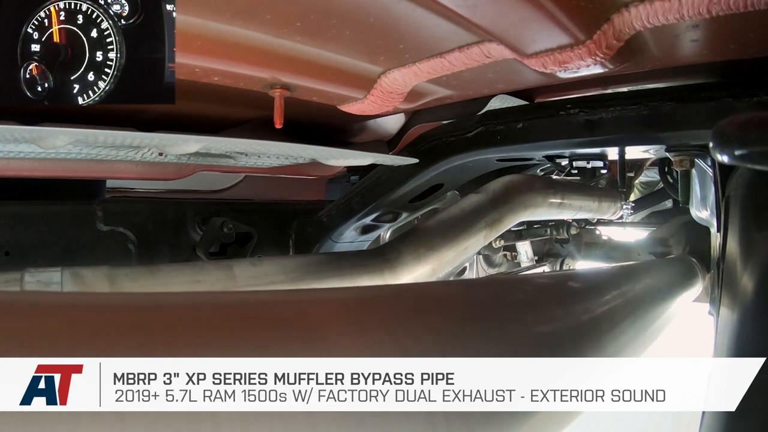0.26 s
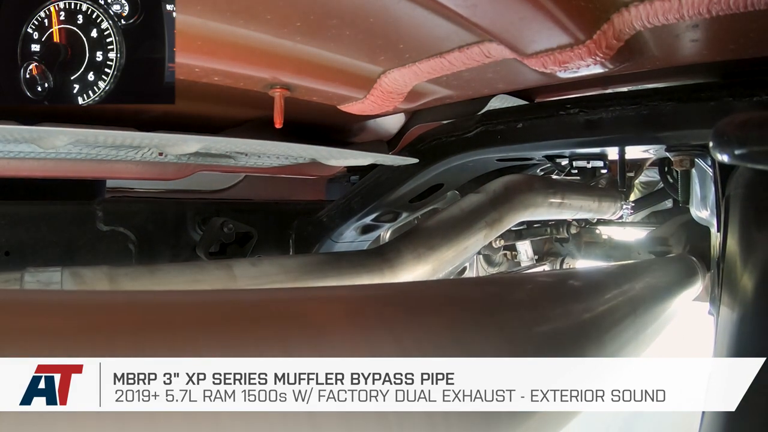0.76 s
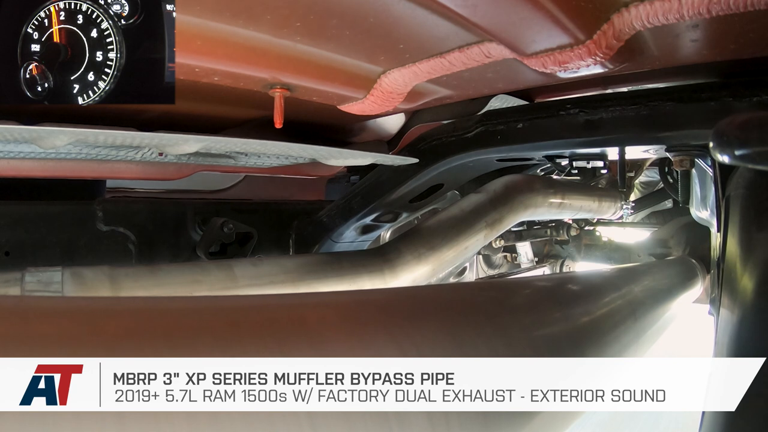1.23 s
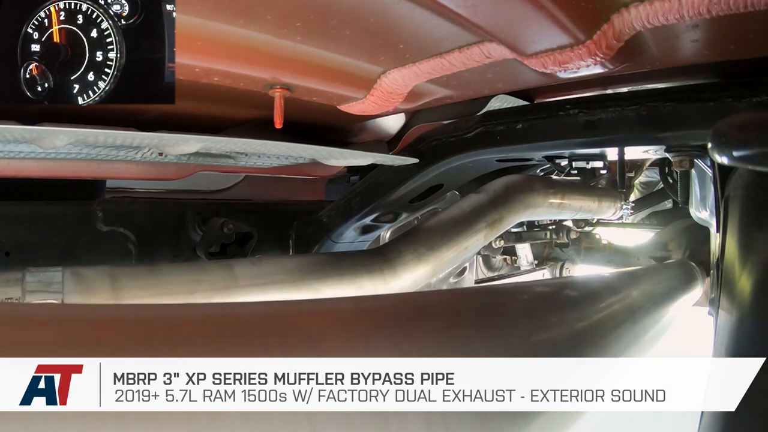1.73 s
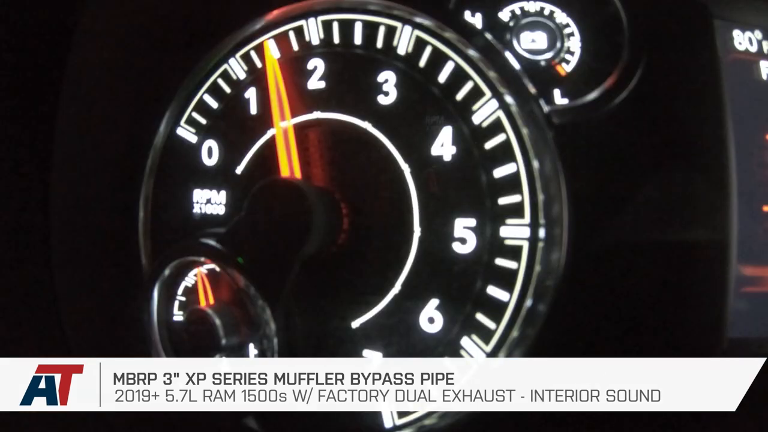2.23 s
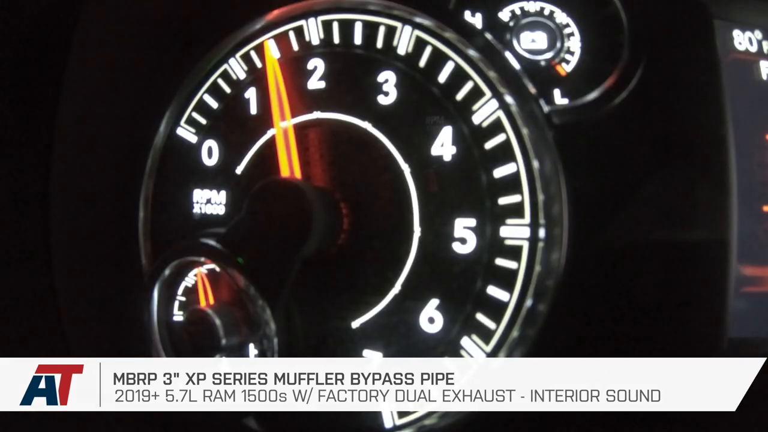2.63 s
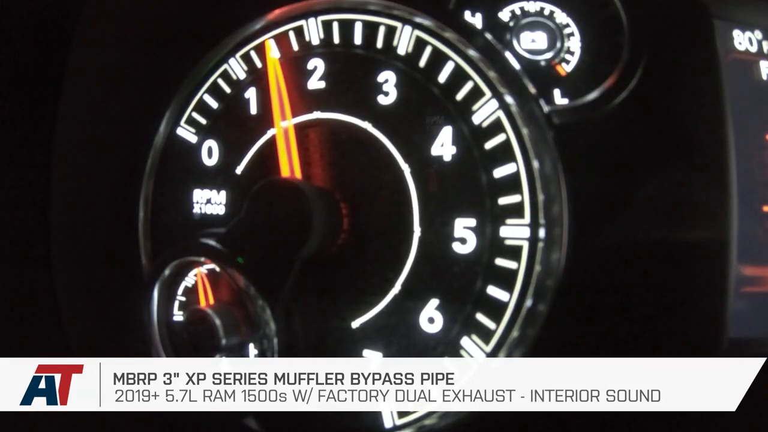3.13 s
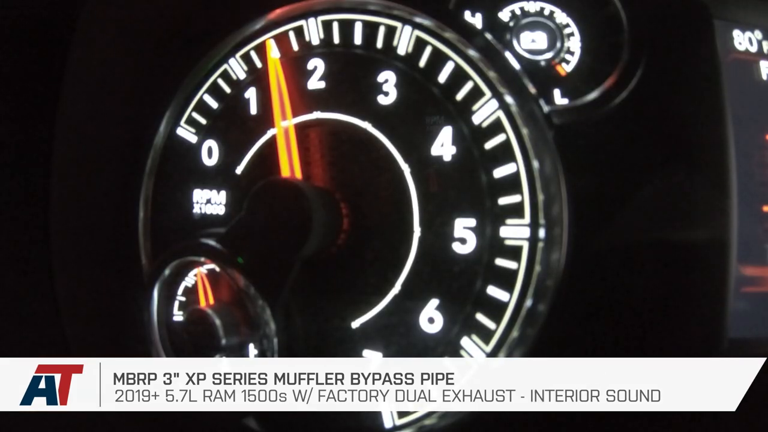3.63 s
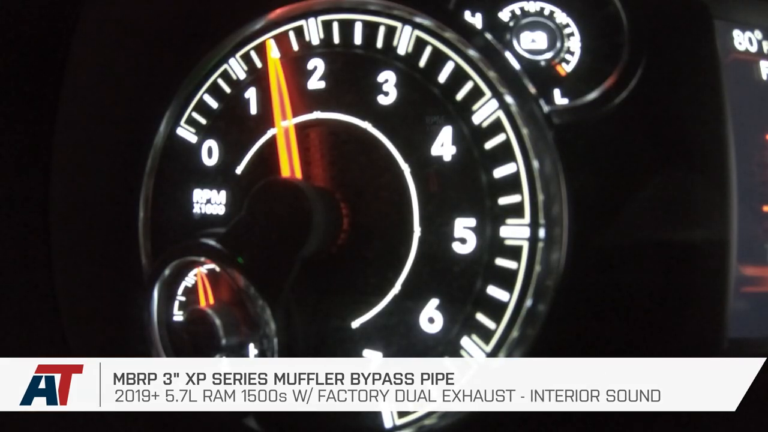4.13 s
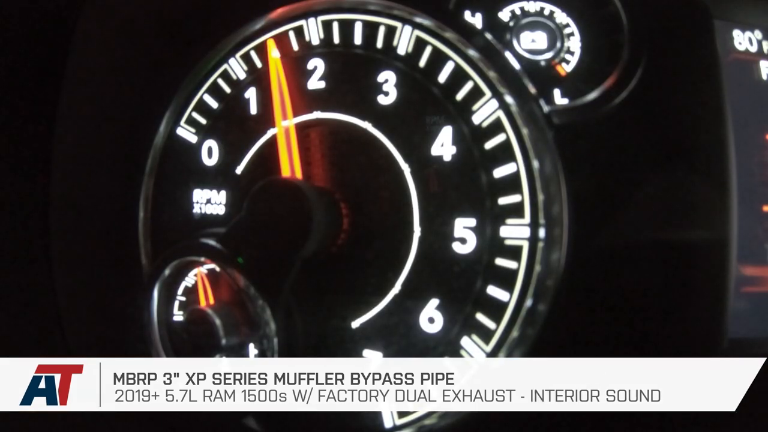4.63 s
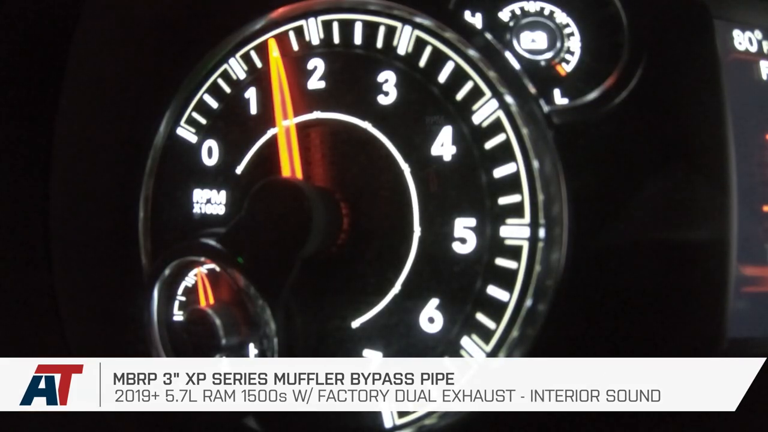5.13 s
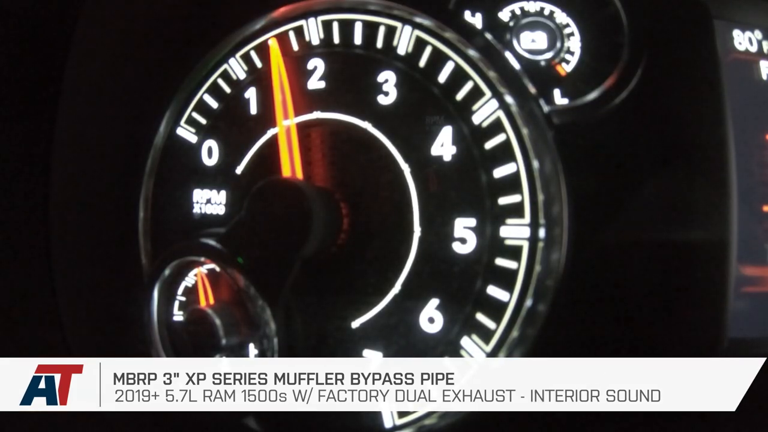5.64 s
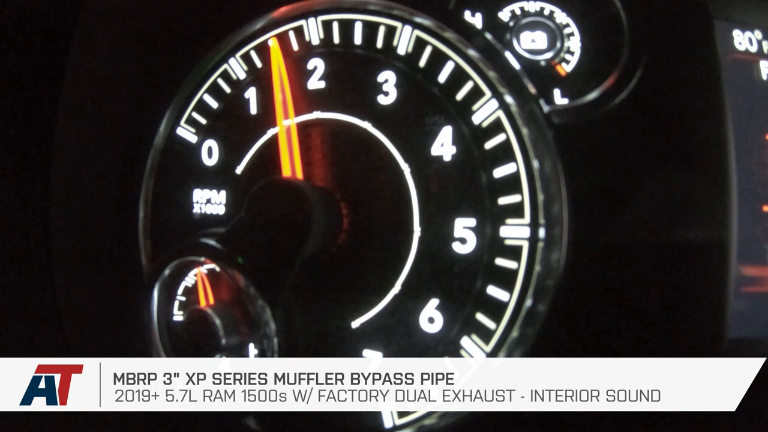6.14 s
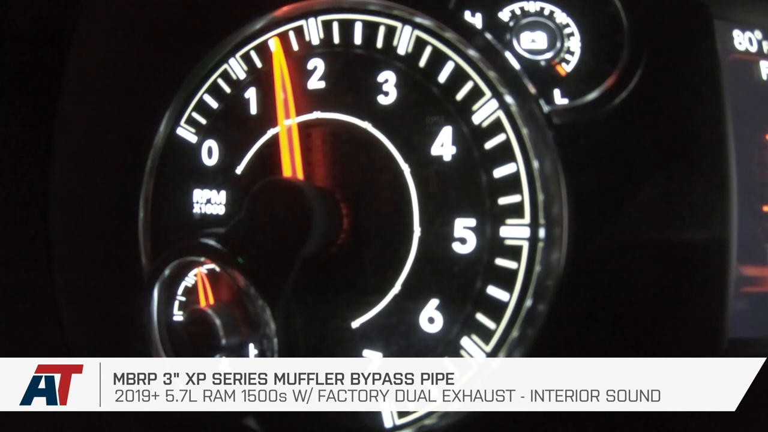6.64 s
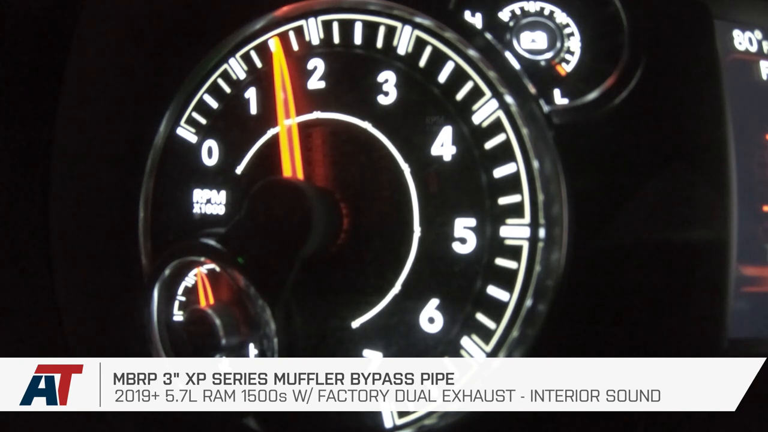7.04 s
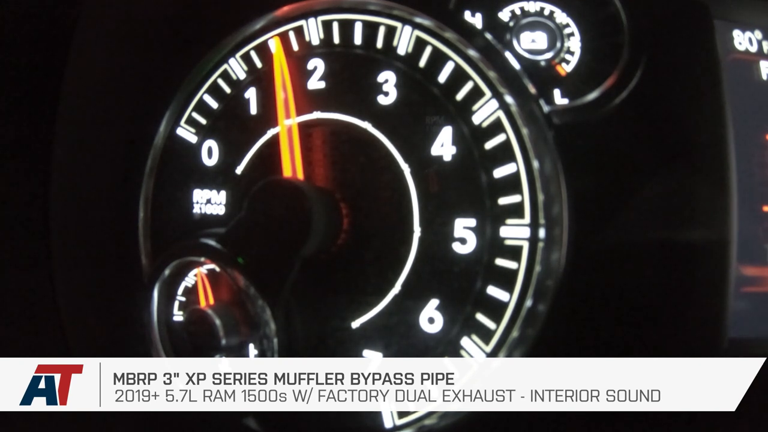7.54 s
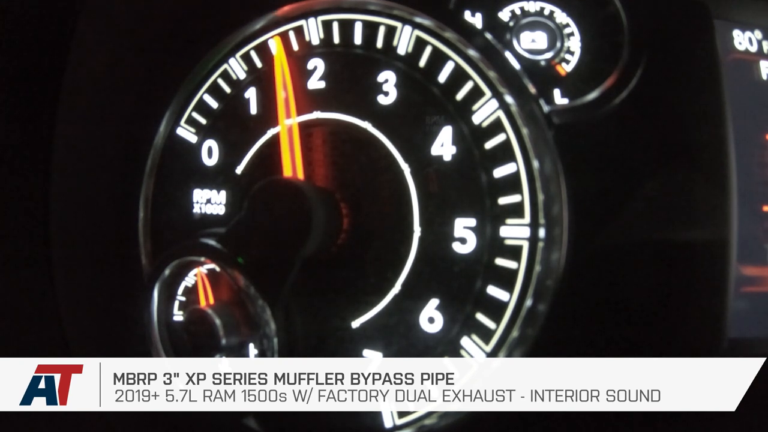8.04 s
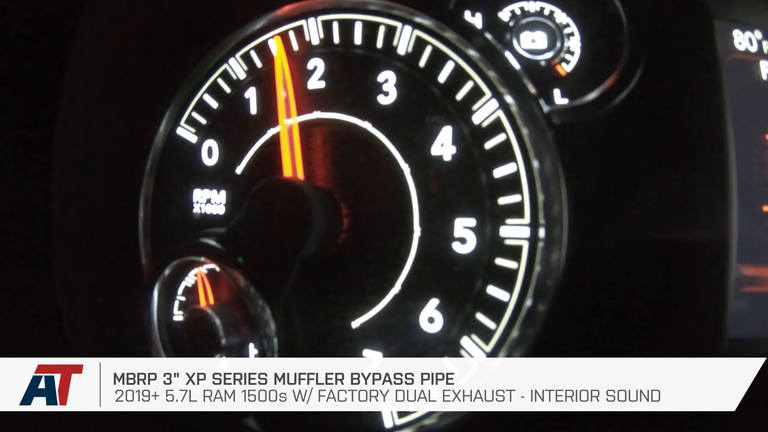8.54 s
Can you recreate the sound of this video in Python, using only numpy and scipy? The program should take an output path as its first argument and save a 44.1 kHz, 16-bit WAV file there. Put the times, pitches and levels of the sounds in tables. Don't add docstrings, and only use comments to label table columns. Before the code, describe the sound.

Loud, raspy, pulsing tailpipe boom of an idling V8 for two seconds, then a muffled low cab hum with a faint cloth rub.

```python
import sys
import numpy as np
from scipy import signal
from scipy.fft import rfft, irfft, next_fast_len
from scipy.io import wavfile

SR = 44100
rng = np.random.default_rng(int(sys.argv[2]) if len(sys.argv) > 2 else 0)


def dump(signal):
    limited = np.clip(np.atleast_2d(signal).T, -1, 1)
    pcm = np.round(limited * 32767).astype(np.int16)
    wavfile.write(sys.argv[1], SR, pcm)


def gain_from_decibels(decibels):
    exponent = np.asarray(decibels, float) / 20
    return 10 ** exponent


N = 387198
TIME = np.arange(N) / SR


def in_time(rows):
    seconds, values = np.transpose(rows)
    return np.interp(TIME, seconds, values)


def rms_one(x):
    return x / np.sqrt(np.mean(x ** 2) + 1e-20)


def drift(rate, count=None):
    points = rng.standard_normal(int(N / SR * 60) + 9)
    memory = np.exp(-2 * np.pi * rate / 60)
    slow = signal.lfilter([1], [1, -memory], points)
    return np.interp(TIME[:count] * 60, np.arange(len(slow)), rms_one(slow))


def resonance(hz, centre, width, lift_db):
    return lift_db / (1 + (2 * (hz - centre) / width) ** 2)


def noise(spectrum, rings=()):
    size = next_fast_len(N)
    hz = np.arange(1, size // 2 + 2) * SR / size
    points = np.array(spectrum, float)
    db = np.interp(np.log(hz), np.log(points[:, 0]), points[:, 1], left=-200, right=-200)
    for centre, width, lift_db in rings:
        db = db + resonance(hz, centre, width, lift_db)
    shaped = rfft(rng.standard_normal(size)) * gain_from_decibels(db)
    return irfft(shaped, size)[:N] * np.sqrt(SR / 2)


def bank_phase(k):
    right_bank = [0, 1, 1, 0, 1, 0, 0, 1]
    cylinder_db = [0, -3, -3.3, 4.5, 0, 4, 0, 2]
    boom_start, right_lead = .746, .082
    pulse_turn = .044
    at = boom_start + np.arange(8) / 8 - right_lead * np.array(right_bank)
    pulses = gain_from_decibels(np.array(cylinder_db)) * np.exp(-2j * np.pi * (k * at - pulse_turn))
    echoes = np.clip((k - 11) / 10, 0, 1) * rng.uniform(-np.pi, np.pi)
    return np.angle(np.sum(pulses)) + echoes


def orders(table, cycles, wobble_db, count):
    out = np.zeros(N)
    for k, level_db in table:
        waver = gain_from_decibels(level_db + wobble_db * np.sqrt(k / 8) * drift(4.0, count=count))
        out[:count] += waver * np.cos(2 * np.pi * k * cycles[:count] + bank_phase(k))
    return out


def tail_orders():
    # (multiple of the cycle rate, level [dB])
    low_orders = [(1, -19), (2, -27), (3, -23), (4, -30), (5, -1), (6, -24), (7, -13), (8, 0), (9, -15),
                  (10, -19), (11, -16), (12, -31), (13, -21), (14, -21), (15, -23), (16, -28), (17, -18),
                  (18, -26), (19, -23), (20, -23), (21, -27), (22, -34), (23, -25), (24, -32)]
    # (multiple of the cycle rate, level [dB])
    pipe_response = [(25, -39), (28, -40), (29, -30), (45, -35), (55, -37), (58, -33.5), (60, -37),
                     (62, -43)]
    k = np.arange(25, 63)
    first, last = 29, 52
    depth = 4.5 * (k >= first) * np.clip((last - k) / (last - first), 0, 1)
    comb = depth * np.cos(2 * np.pi * (k - 29.7) / 3.75)
    high_db = np.interp(k, *np.transpose(pipe_response)) + comb
    return low_orders + list(zip(k, high_db))


def puffs(cycles, sharpness, scatter_db):
    puff_db = [-0.42, 0.7, 0.34, -2.9, -1.3, 0.91, 0.8, -0.99]
    firing = (cycles - .02) * 8 + .5
    index = np.floor(firing).astype(int) + 8
    scatter = scatter_db * rng.standard_normal(1200)[index]
    strength = gain_from_decibels(np.array(puff_db)[index % 8] + scatter)
    return strength * (.5 - .5 * np.cos(2 * np.pi * firing)) ** sharpness


def tailpipes():
    # (time [s], four-stroke cycle rate [Hz])
    tail_speed = [(0, 14.155), (2.4, 14.236)]
    # (frequency [Hz], density [dB per Hz])
    flow_colour = [(9, -56.5), (15, -59), (24, -63), (40, -74), (55, -74), (90, -66.5), (150, -74.5),
                   (250, -78), (360, -83.5), (440, -73.5), (600, -77), (810, -74.5), (950, -83),
                   (1100, -86)]
    # (frequency [Hz], density [dB per Hz])
    rasp_colour = [(750, -105), (950, -86), (1200, -84), (1700, -89), (2300, -92), (2750, -93), (3100, -98),
                   (3600, -100), (3900, -112)]
    # (frequency [Hz], density [dB per Hz])
    hiss_colour = [(3200, -116), (3800, -103), (4500, -106), (5100, -105), (5700, -110), (6400, -112),
                   (7100, -116), (8000, -119), (9000, -121), (11000, -123), (11900, -125), (12600, -131),
                   (13000, -145), (16000, -150)]
    # (frequency [Hz], width [Hz], lift [dB])
    pipe_rings = [(1410, 110, 7), (1915, 60, 4), (2200, 150, 2), (3390, 350, 5), (4100, 300, 2),
                  (4730, 200, 5), (5500, 250, 3), (2660, 80, 3), (2900, 200, -3), (5993, 40, 7),
                  (6795, 25, 8), (7925, 20, 13), (8050, 40, 7), (8838, 50, 5)]
    cycles = np.cumsum(in_time(tail_speed)) / SR + .006
    boom = gain_from_decibels(-26.9) * orders(tail_orders(), cycles, wobble_db=.25, count=int(2.4 * SR))
    flow = puffs(cycles, sharpness=1.6, scatter_db=2.5)
    spit = puffs(cycles, sharpness=1.3, scatter_db=3.5)
    low = noise(flow_colour) * rms_one(1 + .6 * flow)
    rasp = noise(rasp_colour, pipe_rings) * rms_one(1 + .95 * flow) * gain_from_decibels(.5 * drift(6))
    hiss = noise(hiss_colour, pipe_rings) * rms_one(1 + .65 * spit)
    return boom + low + rasp + hiss


def engine_hum(speed, cycles):
    # (time [s], level [dB])
    load = [(2.35, -42), (3.5, -41.5), (4.1, -43), (5.4, -45.5), (6.0, -43), (7.3, -43), (8.0, -44.5),
            (8.78, -43)]
    # (multiple of the cycle rate, level [dB])
    weak_orders = [(7, -67), (9, -64), (10, -76), (11, -71.5), (14, -70), (15, -78.5), (16, -73),
                   (23, -78.5),
                   (6, -67), (17, -75), (20.7, -74), (24.4, -79), (28, -78), (29.6, -79), (31, -80),
                        (32.6, -82), (49.4, -84), (53.8, -85), (57.4, -84)]
    hum = gain_from_decibels(in_time(load)) * orders([(8, 3.5)], cycles, wobble_db=.6, count=N)
    throb_db = -52.5 + 6 * np.abs(speed - 13.3)
    throb = gain_from_decibels(throb_db) * orders([(5, 1.0)], cycles, wobble_db=1.6, count=N)
    weak = gain_from_decibels(3.0) * orders(weak_orders, cycles, wobble_db=1.5, count=N)
    return hum + throb + weak


def body_rumble():
    # (frequency [Hz], density [dB per Hz])
    rumble_colour = [(7, -9.5), (18, -1), (30, -7), (50, -12), (70, -11.5), (92, -17.5), (130, -20.5),
                     (170, -26)]
    return gain_from_decibels(-47 + drift(1.7)) * rms_one(noise(rumble_colour))


def whine(hz):
    turns = np.cumsum(hz + 6 * drift(8)) / SR
    return rms_one(gain_from_decibels(2.5 * drift(9)) * np.cos(2 * np.pi * turns))


def accessory_whine(speed, above_mean):
    # (frequency [Hz], width [Hz], lift [dB])
    overtone_mode = (797, 30, 5)
    hz, overtone_hz = 28.85 * speed, 58.2 * speed
    first_db = -72 - 7 * above_mean
    second_db = -76 + resonance(overtone_hz, *overtone_mode)
    return gain_from_decibels(first_db) * whine(hz) + gain_from_decibels(second_db) * whine(overtone_hz)


def cab_wash(above_mean):
    # (frequency [Hz], density [dB per Hz])
    wash_colour = [(79, -32.5), (135, -1), (173, -3.5), (201, -4), (328, -6), (356, -2.5), (386, -8),
                   (548, -15), (806, -12), (938, -20.5), (1500, -28), (2200, -46), (2860, -71),
                   (4840, -120)]
    # (frequency [Hz], width [Hz], lift [dB])
    cab_rings = [(210, 25, 3), (345, 50, -2.5), (645, 60, -3.5), (955, 50, -3), (1000, 40, 3),
                 (1170, 90, -3), (1250, 60, 2)]
    # (frequency [Hz], density [dB per Hz])
    air_colour = [(1500, -130), (2000, -120), (3000, -123.5), (4200, -129), (5200, -134), (7000, -132),
                  (9700, -134), (9900, -155), (16000, -160)]
    wash_db = -60.5 + 2 * above_mean + .5 * drift(1.9)
    wash = gain_from_decibels(wash_db) * rms_one(noise(wash_colour, cab_rings))
    air_db = .5 * drift(4) + .3 * (TIME - 5.5)
    return wash + noise(air_colour, [(7660, 300, 3)]) * gain_from_decibels(air_db)


def strokes(rows):
    total = np.zeros(N)
    for start, attack, hold, release, db in rows:
        corners = np.cumsum([start, attack, hold, release])
        total += gain_from_decibels(db) * np.interp(TIME, corners, [0, 1, 1, 0]) ** 1.5
    return total


def cloth():
    # (start [s], attack [s], hold [s], release [s], level [dB])
    slides = [
        (3.075, .09, .12, .075, -75.5),
    ]
    # (start [s], attack [s], hold [s], release [s], level [dB])
    rustles = [
        (3.31, .05, .17, .12, -91),
        (3.6, .08, .04, .04, -94),
        (4.12, .02, .01, .02, -93),
        (7.594, .003, .008, .015, -87),
        (7.67, .03, .04, .03, -96),
    ]
    # (frequency [Hz], density [dB per Hz])
    cloth_colour = [(1200, -7), (2500, -2), (6000, -3), (10000, -1.5), (13000, -4), (16000, -12.5)]
    # (frequency [Hz], density [dB per Hz])
    rustle_colour = [(2000, -10), (4000, 0), (11800, 0), (12200, -40)]
    slide = strokes(slides) * rms_one(noise(cloth_colour))
    return slide + strokes(rustles) * rms_one(noise(rustle_colour))


def trim_tick():
    # (time [s], level [dB], frequency [Hz])
    tick = (7.597, -61, 2300)
    start, level_db, hz = tick
    after = np.maximum(TIME - start, 0)
    return gain_from_decibels(level_db - 60 * after / .002) * np.sin(2 * np.pi * hz * after)


def cab():
    # (time [s], four-stroke cycle rate [Hz])
    cab_speed = [(2.0, 12.98), (2.6, 13.09), (3.8, 13.31), (4.4, 13.47), (5.3, 13.59), (5.9, 13.72),
                 (6.5, 13.885), (7.7, 14.04), (8.78, 14.145)]
    speed = in_time(cab_speed)
    cycles = np.cumsum(speed) / SR
    above_mean = speed - 13.6
    engine = engine_hum(speed, cycles) + body_rumble() + accessory_whine(speed, above_mean)
    return engine + cab_wash(above_mean) + cloth() + trim_tick()


def scene():
    # (start [s], end [s])
    crossfade = (2.058, 2.31)
    start, end = crossfade
    inside = np.clip((TIME - start) / (end - start), 0, 1)
    mix = (1 - inside) * tailpipes() + inside * cab()
    return mix[None]


def roll_off(x):
    return signal.sosfilt(signal.butter(12, 15750, fs=SR, output="sos"), x)


def record(dry):
    return roll_off(dry)


dry = scene()
out = record(dry)
dump(out)
```